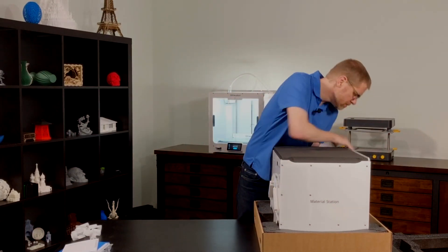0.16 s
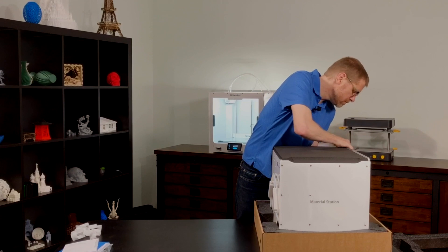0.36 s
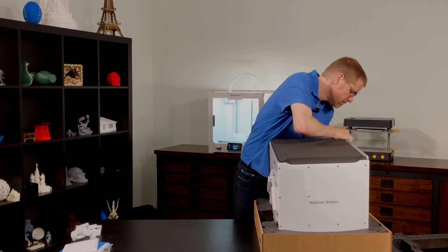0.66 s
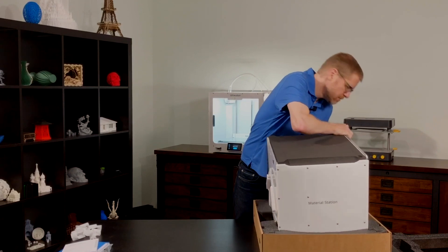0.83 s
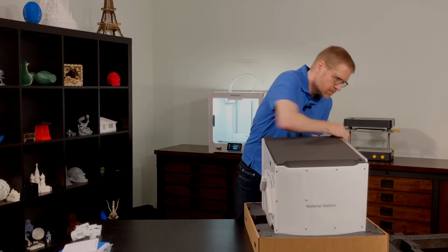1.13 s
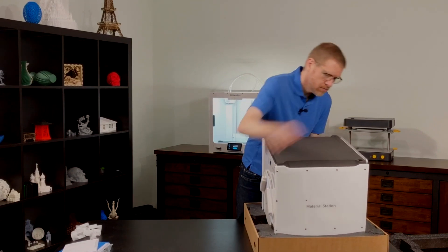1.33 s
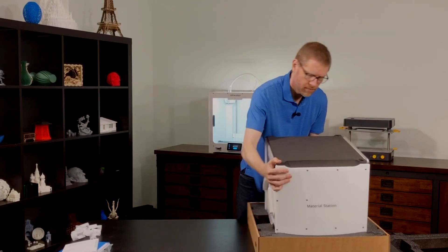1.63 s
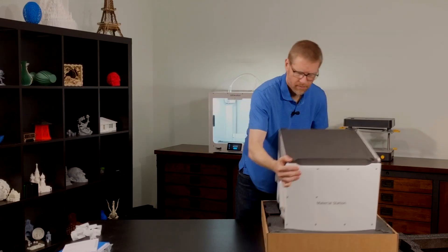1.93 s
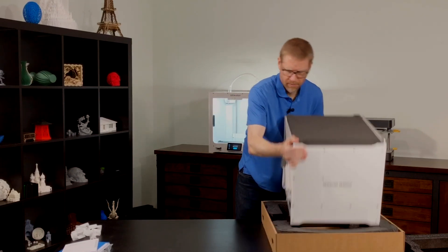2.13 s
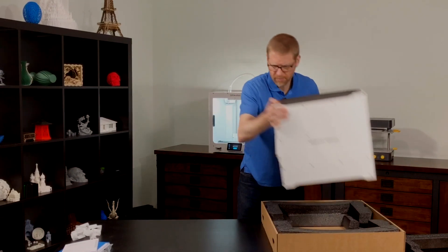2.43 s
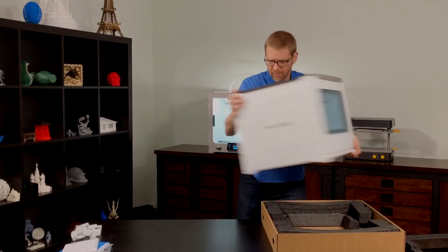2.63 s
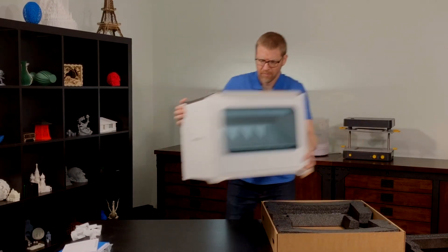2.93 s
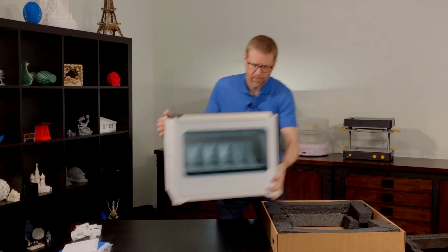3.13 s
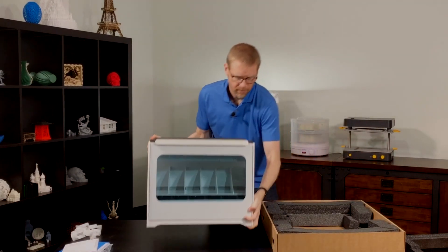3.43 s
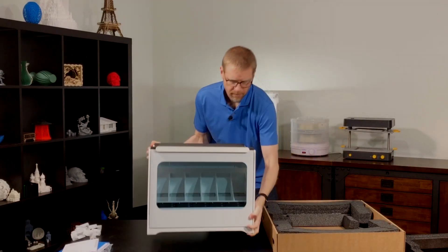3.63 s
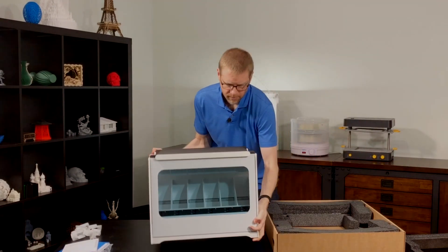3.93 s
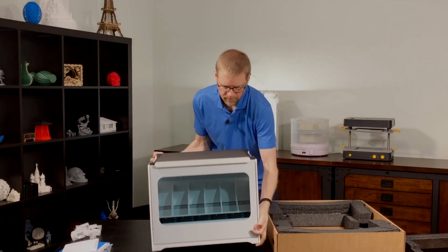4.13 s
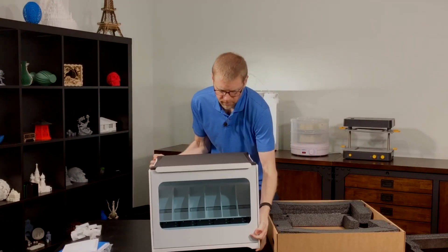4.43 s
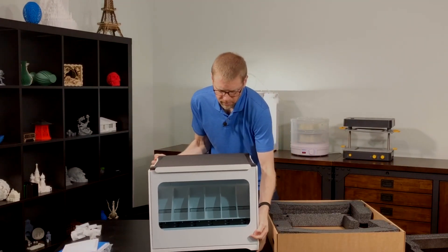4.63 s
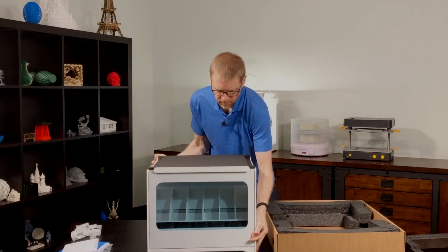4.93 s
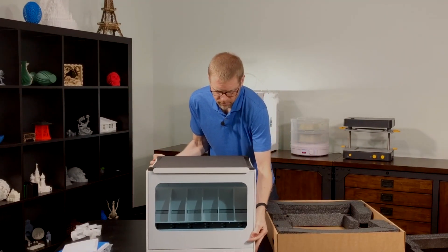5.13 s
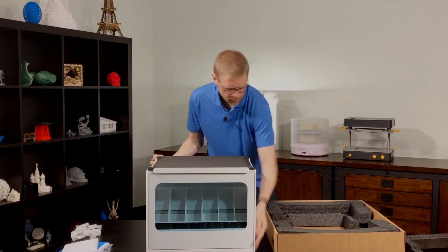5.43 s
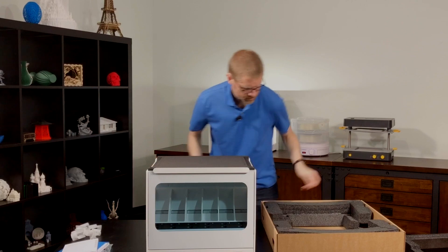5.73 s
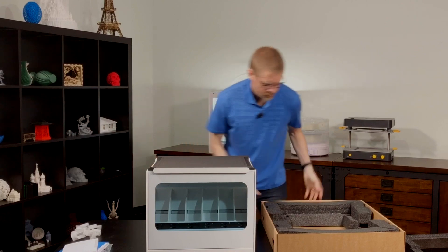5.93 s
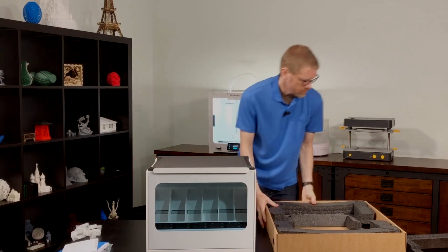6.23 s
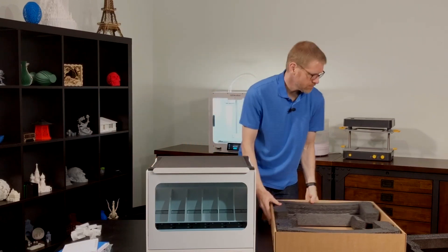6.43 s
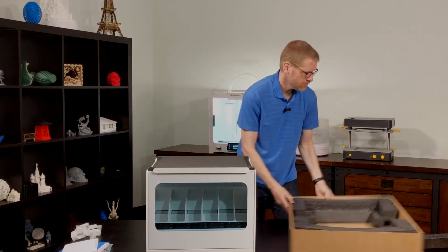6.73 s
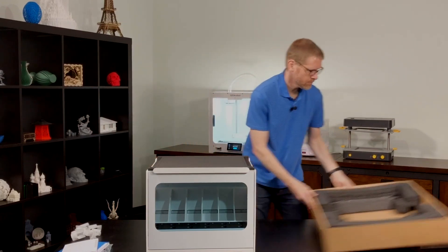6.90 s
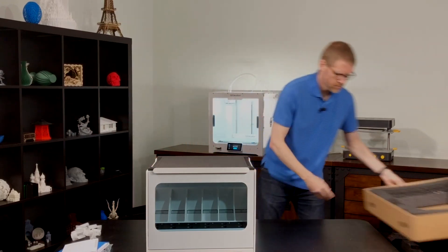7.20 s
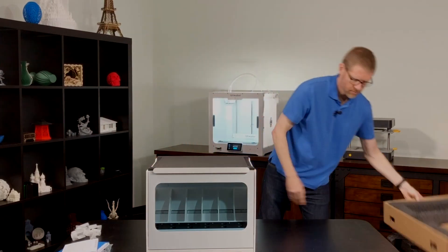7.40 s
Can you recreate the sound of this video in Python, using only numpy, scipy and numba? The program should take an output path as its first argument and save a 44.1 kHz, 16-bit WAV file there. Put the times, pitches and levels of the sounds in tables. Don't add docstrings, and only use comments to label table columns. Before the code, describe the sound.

A small bare room with a quick flutter and short tail, heard from a microphone on the worker's shirt with faint hiss and cloth rumble. From 0 to 2.2 s hands rub a cabinet in foam: uneven hollow rasp and hiss, dry snaps near 0.5, 0.9 and 1.2. At 2.3 a deep shirt tug and panel knocks; at 2.6 a short mid-high foam squeal, then a sharp bright snap at 2.7 and a thin faint squeak near 2.9. Carrying until 4.3 is quiet, with big low air buffets around 2.9 to 3.4. At 4.34 feet meet the wooden table, rocking in several dull thumps to 4.6; at 5.01 comes the loudest, hardest thump with rattle and a few settling knocks. Light rubs follow. From 6.1 the cardboard tray is gripped and dragged, rasping strongest near 6.8 with chirp and snaps, crackling at 7.0, then a final knock at 7.5.

```python
import sys
import numpy as np
from scipy import signal
from scipy.fft import rfft, irfft, next_fast_len
from scipy.io import wavfile
from scipy.ndimage import uniform_filter1d
from numba import njit

SR = 44100
rng = np.random.default_rng(int(sys.argv[2]) if len(sys.argv) > 2 else 0)


def volts(x):
    e = np.asarray(x, float) / 20
    return 10 ** e


def transcribe(signal):
    frames = np.atleast_2d(signal).T
    limited = np.clip(frames, -1, 1)
    pcm = np.round(limited * 32767).astype(np.int16)
    wavfile.write(sys.argv[1], SR, pcm)


N = 333306

# peak in seconds, rise in seconds, fall in seconds,
# pressure in dB, brightness in dB.
RUBS = [(0.0, 0.027, 0.025, -55, -0.5), (0.18, 0.32, 0.016, -60.5, -28), (0.46, 0.32, .05, -57.5, 0),
        (0.495, 0.019, 0.26, -47, 1.5), (0.59, .12, 0.49, -49, -19), (0.78, 0.1, 0.05, -50, -18),
        (0.88, 0.022, 0.14, -42.5, 7), (1.03, 0.42, 0.38, -46.5, -11.5), (1.15, 0.69, 0.19, -45, 3),
        (1.325, 0.033, 0.12, -53, -2), (1.67, 0.23, 0.22, -50.5, -18.5), (1.84, 0.36, 0.19, -56, 12.5),
        (1.99, 0.47, 0.04, -46.5, -3), (2.11, 0.43, 0.2, -47, 7), (2.212, 0.13, 0.091, -59, -11)]
# peak in seconds, rise in seconds,
# fall in seconds, pressure in dB, brightness in dB.
CARRY = [(2.333, 0.05, 0.067, -46, -16.5), (2.52, 0.23, 0.11, -49, -21),
         (2.588, 0.094, 0.034, -26.5, -24.5), (2.609, .015, 0.041, -44, -34), (2.752, 0.05, 0.43, -62, 7.5),
         (2.962, 0.018, 0.02, -62, 12.5), (3.0, 0.014, 0.12, -45, -17), (3.27, 0.44, .07, -64.5, -11),
         (3.377, 0.013, 0.08, -62.5, 9), (3.856, 0.072, 0.32, -75.5, 10.5), (4.108, 0.13, .02, -64.5, -4),
         (4.658, 0.024, .12, -47.5, -15), (4.878, 0.13, 0.18, -50.5, -11.5), (4.97, 0.15, 0.089, -44, -8),
         (5.362, 0.1, .11, -65.5, 4), (5.449, 0.04, 0.14, -57.5, 8), (5.55, .03, .13, -60, 2.5),
         (5.7, 0.32, 0.33, -75, 13), (5.984, 0.35, 0.029, -67.5, -7)]
# peak in seconds, rise in seconds,
# fall in seconds, pressure in dB, brightness in dB.
DRAG = [(6.094, 0.012, 0.22, -63.5, 11), (6.17, 0.092, 0.27, -54, -24), (6.31, 0.17, 0.33, -45, 0.5),
        (6.39, 0.042, 0.048, -53, 5), (6.49, 0.087, 0.28, -49.5, 6), (6.58, 0.13, 0.16, -47, 3),
        (6.685, 0.23, 0.063, -47.5, 1), (6.781, 0.12, 0.096, -40.5, -2), (6.861, 0.61, 0.11, -50.5, 13.5),
        (6.93, 0.015, 0.24, -49.5, 2), (7.012, 0.017, 0.0095, -43.5, -2), (7.031, 0.017, 0.11, -53, -4),
        (7.399, 0.015, 0.019, -49.5, -42), (7.46, 0.092, 0.52, -58, -6), (7.512, 0.013, 0.032, -38.5, -3),
        (7.528, 0.027, 0.19, -41, 0)]
# time in seconds, octaves above the slowest hiss.
STROKE_SPEED = [
    [(0.0, 1.8), (0.5, 0.79), (0.6, 0.3), (0.77, 0.92), (0.9, 0.5), (1.0, 0.68), (1.13, 1.02), (1.25, 0.7),
     (1.35, 1.5)],
    [(1.55, 0.1), (1.7, 0.6), (1.84, 1.05), (1.96, 0.44), (2.1, 0.66), (2.2, 0.36), (2.6, 0.85),
     (2.8, 0.76), (5.9, 0.77)],
    [(6.1, 1.5), (6.3, 0.76), (6.5, 0.88), (6.67, 0.92), (6.78, 1.06), (6.87, 1.5), (6.95, 0.76),
     (7.1, 1.3), (7.56, 0.56)],
]
# frequency in Hz, width in Hz, level in dB.
BOX_MODES = [(202, 64, -20), (315, 31, 5), (400, 110, 6), (564, 60, -16), (740, 27, -15.5), (1030, 81, 1)]
# frequency in Hz, level in dB.
RASP_SPECTRUM = [(710, -59), (1200, -27), (4200, -28), (5600, -35), (9600, -60)]
# peak in seconds, rise
# in seconds, fall in seconds, level in dB, frequency in Hz.
CATCHES = [(0.5, 0.063, 0.12, -45, 626), (0.58, 0.054, 0.086, -47.5, 2800),
           (0.885, .015, 0.019, -39.5, 3950), (0.91, .02, 0.045, -36, 3300),
           (1.025, .008, 0.013, -49, 6500), (1.13, 0.11, 0.21, -48, 2460), (1.196, .012, .015, -38, 2870),
           (1.325, .012, 0.029, -48, 4400), (2.59, .08, 0.015, -39, 4450), (2.56, 0.066, .05, -38.5, 700),
           (2.595, 0.023, 0.024, -34.5, 2300), (3.0, .008, 0.046, -55, 1900),
           (3.06, 0.0073, 0.029, -53, 2640), (2.72, .012, 0.14, -53, 5550), (4.345, .006, 0.036, -41, 770),
           (4.415, .01, .03, -43, 1870), (5.06, .02, 0.14, -38, 3670), (5.08, 0.036, 0.067, -26.5, 1050),
           (6.31, .05, 0.099, -49, 780), (6.39, .03, .03, -58, 7500), (6.87, .06, 0.042, -40, 9300),
           (6.87, 0.053, 0.057, -40, 5250), (7.49, 0.026, .02, -58, 1820), (2.222, 0.0049, 0.018, -43, 500),
           (2.33, 0.03, .07, -43, 1200), (2.58, 0.1, .08, -38, 230), (2.59, .08, .04, -39, 1600),
           (4.35, .012, .2, -46, 1494), (4.95, 0.14, .1, -53, 1887), (2.34, .01, .03, -51, 5500),
           (2.85, .1, 0.061, -55, 8000), (2.8, .08, .1, -61, 10800), (2.899, 0.15, .06, -55.5, 300),
           (4.343, 0.0047, 0.071, -21, 400), (4.509, .004, 0.054, -30, 420),
           (5.015, 0.0035, 0.028, -17, 390), (5.03, 0.017, 0.093, -23.5, 760),
           (5.13, 0.054, 0.11, -31.5, 320), (5.57, 0.14, 0.088, -58.5, 300), (6.15, .05, 0.093, -48.5, 320),
           (7.52, 0.0093, 0.066, -32, 400)]
# time in seconds, frequency in Hz, level in dB.
SQUEALS = [
    [(2.46, 1205, -49), (2.53, 1180, -37), (2.57, 1130, -26.5), (2.59, 1160, -23), (2.605, 1130, -30),
     (2.63, 1150, -51)],
    [(2.73, 5430, -81), (2.80, 5530, -59), (2.86, 5330, -51), (2.92, 5440, -64)],
    [(6.75, 783, -97), (6.77, 757, -34), (6.80, 770, -38.5), (6.83, 770, -41)],
]
# frequency in Hz, width in Hz, depth from 0 to 1.
CHEST_DIPS = [(1324, 300, 0.1), (2800, 620, 0.13)]
# start in seconds, peak in dB, hardness in dB per octave.
THUMPS = [(4.3415, -12.5, -1), (4.378, -22, -1), (4.418, -16.5, -1.5), (4.451, -22, -1.5),
          (4.508, -15, -2.5), (4.544, -19.5, -1.5), (4.563, -26, 1), (4.595, -30.5, -2.5),
          (5.0121, -6, -0.5), (5.025, -9, -1.5), (5.074, -18, 1), (5.125, -13, -1.5), (5.188, -22, 1.5)]
# frequency in Hz, level in dB, T60 in seconds.
TABLE_MODES = [(78.5, -14.5, 0.15), (106, 0.5, 0.065), (140.7, -14.5, 0.043), (160, 0, 0.063),
               (184.4, -4, 0.093), (205, -4.5, 0.048), (252, -9, 0.046), (288.3, 0.5, 0.062),
               (340, 1, 0.045), (409.6, 2.5, 0.041), (471.6, 2, 0.039), (551, -2, 0.041),
               (662, -2.5, 0.038), (796, -2, 0.029)]
# start in seconds, peak in dB, frequency in Hz,
# T60 in seconds.
RINGS = [(4.340, -12, 126.5, 0.084), (4.374, -13, 152, 0.11), (4.425, -22, 105, 0.18),
         (4.506, -19, 107, 0.21), (4.553, -24, 154, .15), (4.59, -24, 148.5, .15),
         (5.012, -9.5, 452, 0.033), (5.013, -11.5, 93, 0.19), (5.036, -14, 333, .1),
         (5.085, -16.5, 106, 0.25), (5.12, -16, 243, 0.05), (5.165, -19, 160, 0.091),
         (5.18, -21.5, 248, 0.073)]
# start in seconds, fall in seconds, rattle in dB,
# bright part in dB relative, table boom in dB relative.
SHAKES = [
    (4.339, 0.27, -29, -28.5, -5.5),
    (4.508, 0.38, -43.5, -17.5, 19),
    (5.012, 0.17, -12.5, -22, 9.5),
    (5.125, 0.12, -34, -20, 5),
]
# start in seconds, peak in dB, frequency in Hz, T60 in seconds.
KNOCKS = [(0.472, -53, 600, 0.038), (1.317, -37.5, 740, 0.028), (2.222, -30.5, 454, 0.012),
          (2.2845, -19, 240, 0.019), (2.285, -25.5, 1063, 0.019), (2.301, -29, 450, 0.0076),
          (2.3275, -25.5, 603, 0.042), (2.391, -36, 720, 0.082), (2.992, -30.5, 740, 0.015),
          (3.021, -39, 476, 0.015), (3.056, -35.5, 455, 0.048), (3.371, -53, 494, 0.17),
          (3.861, -57, 494, 0.067), (4.098, -64, 700, 0.049), (4.342, -17.5, 674, 0.025),
          (4.508, -23, 297, 0.023), (5.0125, -5, 450, 0.028), (5.438, -45, 923, 0.032),
          (6.81, -36, 297.7, 0.035), (6.929, -45, 1606, 0.046), (7.512, -22, 364, 0.018)]
# start in seconds, peak in dB, frequency in Hz, T60 in seconds.
TAPS = [(3.26, -50.5, 1660, 0.027), (6.947, -35.5, 1470, 0.028), (7.012, -32, 588, 0.016),
        (7.385, -38, 445, 0.018), (7.506, -19, 545, 0.022)]
# start in seconds, peak in dB, frequency in Hz,
# lower crackle in dB relative, upper fizz in dB relative.
SNAPS = [(0.497, -26, 5440, -18, -4), (0.5127, -30, 5500, -30, -10), (0.7646, -35, 3000, -43, -11),
         (0.8344, -46, 4140, -16, -6), (0.8783, -25.5, 3900, -30, -11), (0.8917, -24, 6400, -4.5, -5),
         (0.9064, -34, 3960, -25, -2), (1.024, -26, 6500, -15, -9), (1.1977, -31, 2850, -17, -8),
         (1.32, -30.5, 4300, -6, -4), (1.514, -36.5, 5530, -20, 0), (2.302, -44, 4000, 16, -4),
         (2.328, -31, 4700, 0, -13), (2.3554, -39.5, 8650, -12, -10), (2.3727, -39.5, 4500, 4, -10),
         (2.706, -15.5, 5460, -17, -7.5), (2.959, -41, 5040, -19, -11), (2.9947, -46, 4150, 9.5, -8),
         (3.024, -36.5, 4240, -19, -10), (3.3731, -46, 6300, -0.5, -4), (3.419, -43, 5300, -19, -8),
         (4.318, -50, 3500, 2.5, -3), (4.663, -31, 5670, -9, -14), (5.013, -28.5, 4500, 19.5, -6),
         (5.025, -14.5, 7370, 3, -4), (5.43, -36, 6100, -12, 1), (5.5425, -43, 7070, -1, -3),
         (5.8556, -47.5, 6000, -13, 1), (6.0937, -54.5, 7000, -18, -5), (6.4554, -31, 5500, -4.5, -6),
         (6.7682, -41, 6000, -35.5, -6), (6.8166, -22, 4560, -6, -4), (6.9453, -21.5, 4700, -5, -4),
         (7.01, -29, 6500, -5, -2), (7.2173, -49.5, 5530, 1, -4.5), (7.4147, -55, 4000, -10, -10),
         (7.517, -30, 4800, -11, -4), (7.4335, -47, 6680, -18, -6)]
# peak in seconds, rise in
# seconds, fall in seconds, deep part in dB, upper part in dB relative.
GUSTS = [(0.05, 0.56, 0.33, -35.5, -9.5), (0.24, 0.065, 0.048, -42, -5), (0.6, 1, 0.96, -42.5, -7),
         (0.94, 0.32, 0.066, -40, -7), (1.2, 0.67, 0.51, -39, -7), (1.4, 0.073, 0.17, -33, -22),
         (1.64, 0.49, 0.12, -33.5, -11.5), (1.88, 0.36, 0.33, -44.5, -19), (2.15, 0.74, 0.58, -43.5, -5.5),
         (2.34, 0.11, 0.12, -29, -2.5), (2.539, 0.066, 0.17, -33, 2.5), (2.72, 0.46, 0.31, -29.5, -30),
         (2.9, 0.19, 0.57, -18, -35), (2.99, .11, 0.21, -41, -21), (3.22, 0.047, 0.029, -11.5, -36.5),
         (3.367, 0.11, 0.042, -12, -63), (3.511, 0.24, 0.094, -31.5, -22), (3.66, 0.1, 0.12, -19, -42),
         (3.881, 0.19, 0.029, -28, -26), (4.107, 0.47, 0.12, -40, -12),
         (4.345, 0.016, 0.18, -26.5, 2.5), (4.55, 0.22, 0.2, -44.5, 21.5), (4.9, 0.11, 0.25, -45, 1),
              (5.02, 0.077, 0.45, -30.5, -14), (5.57, 0.15, 0.13, -32.5, -6), (5.91, 0.3, 0.39, -27, -25),
              (6.1, 0.1, 0.98, -32.5, -18), (6.3, 0.29, 0.1, -27.5, -11), (6.579, 0.077, 0.03, -35.5, -14),
              (6.83, 0.13, 0.11, -61, 16), (6.99, 0.043, 0.16, -37.5, -11), (7.09, 0.075, 0.11, -39.5, -20),
              (7.27, 0.24, 0.079, -29.5, -43), (7.38, 0.19, 0.1, -32.5, -27.5),
              (7.51, 0.033, 0.24, -44.5, 16)]
# start in seconds, peak in dB, frequency in Hz, T60 in seconds.
BUMPS = [(0.09, -37, 66, .15), (1.385, -24, 38, .1), (1.39, -30, 110, .11), (1.635, -33, 70, .14),
         (2.338, -20, 26, .12), (2.2835, -13, 90, .05), (2.79, -30, 85, .1), (2.84, -24, 62, .1),
         (2.98, -27, 60, .15), (4.341, -36, 70, .2), (5.012, -16, 28, .13), (5.014, -26, 105, .24),
         (5.548, -28, 69, .17), (6.806, -35, 100, .16)]
# frequency in Hz, level in dB.
FLOOR_SPECTRUM = [(35, -43.5), (60, 4.5), (124, -18), (329, -12.5), (563, -24), (694, -23.5), (1300, -27.5),
                  (5400, -24), (9460, -26), (14700, -33), (16200, -39)]
# frequency in Hz, T60 in seconds.
ROOM_T60 = [(60, 0.6), (250, 0.51), (1000, 0.29), (4000, 0.41), (8000, 0.11), (15000, 0.34)]


def unit(x):
    return x / np.sqrt(np.mean(x ** 2) + 1e-20)


def evened(x, span_s):
    power = uniform_filter1d(x ** 2, round(span_s * SR)).clip(1e-20)
    return unit(x / power ** .4)


def in_time(rows, silent=-120):
    s, *columns = np.transpose(rows)
    return [np.interp(np.arange(N) / SR, s, c, silent, silent) for c in columns]


def at_hz(points, hz):
    point_hz, value = np.transpose(points)
    return np.interp(np.log(hz), np.log(point_hz), value)


def swells(rows, rounding):
    t = np.arange(0, N + 32, 32) / SR
    s, rise, fall, db, relative_db = np.transpose(rows)[:, :, None]
    distance = np.abs(t - s) / np.where(t < s, rise, fall)
    shape = db - 20 * distance ** rounding
    power = [np.sum(volts(2 * (shape + extra)), axis=0) + 1e-14 for extra in (0, relative_db)]
    return [np.interp(np.arange(N) / SR, t, 10 * np.log10(p)) for p in power]


def gains(db, smooth_hz):
    return signal.sosfilt(signal.butter(1, smooth_hz, fs=SR, output="sos"), volts(db))


def drift(rate):
    knot_rate = 200
    knots = rng.standard_normal(int(N / SR * knot_rate) + 3)
    r = np.exp(-2 * np.pi * rate / knot_rate)
    slow = unit(signal.lfilter([1], [1, -2 * r, r * r], knots))
    return np.interp(np.arange(N) * knot_rate / SR, np.arange(len(slow)), slow)


def band(x, low_hz, high_hz, order=2):
    return signal.sosfilt(signal.butter(order, [low_hz, high_hz], "band", fs=SR, output="sos"), x)


def coloured(x, spectrum):
    size = next_fast_len(len(x))
    hz = np.maximum(np.fft.rfftfreq(size, 1 / SR), 1)
    return unit(irfft(rfft(x, size) * volts(at_hz(spectrum, hz)), size)[:len(x)])


def resonate(x, hz, width):
    r = np.exp(-np.pi * width / SR)
    gain = (1 - r * r) / 2
    return signal.lfilter([gain, 0, -gain], [1, -2 * r * np.cos(2 * np.pi * hz / SR), r * r], x)


@njit
def swept(x, hz, width_share):
    out = np.zeros(len(x))
    for i in range(2, len(x)):
        r = np.exp(-np.pi * width_share * hz[i] / SR)
        turn = 2 * r * np.cos(2 * np.pi * hz[i] / SR)
        out[i] = (1 - r * r) / 2 * (x[i] - x[i - 2]) + turn * out[i - 1] - r * r * out[i - 2]
    return out


def slips(per_s, spread_db, clump_db):
    sizes = volts(spread_db * np.minimum(rng.exponential(1, N), 5)) * rng.choice([-1, 1], N)
    slipping = rng.random(N) < per_s / SR
    return unit(sizes * slipping * volts(clump_db * drift(8.8)))


def add(out, s, sound):
    at = round(s * SR)
    out[at:at + len(sound)] += sound[:N - at]


def blows(table, ratios, rise_cycles):
    out, t = np.zeros(N), np.arange(SR // 3) / SR
    chance = rng.standard_normal((len(table), len(ratios), 2))
    for (s, db, hz, t60), luck in zip(table, chance):
        tones = np.zeros(len(t))
        for ratio, (level, detune) in zip(ratios, luck):
            mode_db = 2 * level - 6 * abs(np.log2(ratio))
            mode_hz = hz * ratio * (1 + level * detune / 30)
            tones += volts(mode_db) * np.sin(2 * np.pi * mode_hz * t)
        sound = tones * (1 - np.exp(-t * hz / rise_cycles)) * volts(-60 * t / t60)
        add(out, s, volts(db) * sound / np.abs(sound).max())
    return out


def friction():
    body_db, hiss_db = swells(RUBS + CARRY + DRAG, 1.2)
    brightness = hiss_db - body_db
    rasp_db = body_db - 1 + 0.44 * brightness.clip(-16)
    slowest_hiss_hz = 3150
    hiss_hz = slowest_hiss_hz * 2 ** in_time(sum(STROKE_SPEED, []), silent=1)[0]

    drive = slips(2500., 3.0, 2.0)
    hollow = np.zeros(N)
    for k, (hz, width, db) in enumerate(BOX_MODES):
        hollow += volts(db) * resonate(drive, hz, width) * (-1) ** k
    body = evened(unit(hollow) + 5.3 * unit(band(drive, 280, 874)), 0.027)
    rasp = evened(coloured(slips(5000., 2.5, 3.0), RASP_SPECTRUM), 0.04)
    grains = band(slips(10000., 2.0, 3.2), 1500, 13600)
    hiss = evened(swept(grains, hiss_hz, .99), 0.12)
    levels_db = np.array([body_db, rasp_db, hiss_db]) - 1.5
    return np.sum(gains(levels_db, 60) * [body, rasp, hiss], axis=0)


def catches():
    lead_s, width_share = .2, 0.24
    drive, out = slips(4000., 2.5, 1.5), np.zeros(N)
    t = np.arange(SR // 2) / SR - lead_s
    for s, rise, fall, db, hz in CATCHES:
        at = round((s - lead_s) * SR)
        narrow = resonate(drive[at:at + len(t)], hz, width_share * hz)
        tone = unit(resonate(narrow, hz, 2 * width_share * hz))
        shape = volts(db - 20 * np.abs(t) / np.where(t < 0, rise, fall))
        add(out, at / SR, tone * shape[:len(tone)])
    return out


def squeals():
    hz, db = np.max([in_time(rows) for rows in SQUEALS], axis=0)
    hz = np.clip(hz, 700, 6000)
    narrow = swept(slips(8000., 2.0, 0.5), hz, .12)
    return volts(db - 3) * evened(swept(narrow, hz, .22), .02)


def patchy(x):
    for hz, width, depth in CHEST_DIPS:
        x = x - depth * resonate(x, hz, width)
    out = x.copy()
    for hz in np.geomspace(700, 9000, num=8):
        swell = volts(1.3 * drift(12.0)) - 1
        out += swell * resonate(x, hz, hz / 4)
    return out


def thumps():
    contact_s = 0.0021
    out, t = np.zeros(N), np.arange(SR // 2) / SR
    chance = rng.standard_normal((len(THUMPS), len(TABLE_MODES), 2))
    loading = np.sin(np.pi / 2 * np.minimum(t / contact_s / 2, 1)) ** 2
    for (s, db, hard_db), luck in zip(THUMPS, chance):
        modes = np.zeros(len(t))
        for (hz, mode_db, t60), (strength, phase) in zip(TABLE_MODES, luck):
            level_db = mode_db + hard_db * np.log2(hz / 150) + 2 * strength
            modes += volts(level_db - 60 * t / t60) * np.sin(2 * np.pi * hz * t + 0.78 * phase)
        modes *= loading
        add(out, s, volts(db) * modes / np.abs(modes).max())
    return out


def rings():
    return blows(RINGS, [1.0], 0.98)


def rattle():
    rise_s, boom_lingers, rounding = 0.0021, 0.65, 1.08
    parts = [(s, rise_s, fall, db, bright) for s, fall, db, bright, _ in SHAKES]
    table = [(s, rise_s, fall * boom_lingers, db, boom) for s, fall, db, _, boom in SHAKES]
    dull_db, bright_db = swells(parts, rounding)
    _, boom_db = swells(table, rounding)

    drive = slips(5000., 1.3, 0.94)
    modes = sum(volts(db) * resonate(drive, hz, 6.1 / t60) for hz, db, t60 in TABLE_MODES[1:11])
    boom = band(evened(modes, 0.025), 110, 594)
    dull = unit(band(band(drive, 560, 1380, order=1), 600, 3330, order=1))
    bright = unit(band(band(drive, 2200, 5000, order=1), 1900, 7500, order=3))
    shake = gains([dull_db, bright_db, boom_db - 4], 150)
    return volts(-8.0) * np.sum(shake * [dull, bright, boom], axis=0)


def knocks():
    panels = blows(KNOCKS, [.55, .75, 1.0, 1.3, 1.7, 2.2, 2.9], 0.25)
    return panels + blows(TAPS, [1.0, 1.12], 0.74)


def snaps():
    t60_s, first_break = .0045, 6
    out, t = np.zeros(N), np.arange(SR // 20) / SR
    for s, db, hz, low_db, top_db in SNAPS:
        burst = rng.standard_normal(len(t)) + first_break * (t == 0)
        burst *= volts(-60 * t / t60_s)
        fizz = band(burst, 1.33 * hz, 12000, order=3) + .2 * band(burst, 11000, 15000)
        bright = band(burst, .84 * hz, 1.2 * hz, order=4) + volts(top_db) * fizz
        low = band(burst, 1000, 3500)
        sound = bright / np.abs(bright).max() + volts(low_db) * low / np.abs(low).max()
        add(out, s, volts(db) * sound)
    return out


def heave():
    start_s, db, hz = 2.2888, -6.5, 37.5
    out, turns = np.zeros(N), np.arange(round(1.5 * SR / hz)) * hz / SR
    edges = np.sin(np.pi * turns / 1.5) ** .15
    add(out, start_s, -volts(db) * np.sin(2 * np.pi * turns) * edges)
    return out


def rumble():
    deep = evened(band(rng.standard_normal(N), 13, 44, order=3), .1)
    upper = evened(band(rng.standard_normal(N), 60, 190), .05)
    at_rest_db = [[-56.5], [-64]]
    gusts_db = np.maximum(swells(GUSTS, 1.1), at_rest_db)
    deep_gain, upper_gain = gains(gusts_db - [[0], [4]], 30)
    eddies = band(deep_gain * deep, 11, 54, order=3) + band(upper_gain * upper, 55, 240)
    return eddies + blows(BUMPS, [1.0], 1.0)


def noise_floor():
    return volts(-61.5) * coloured(rng.standard_normal(N), FLOOR_SPECTRUM)


def room(x, tail_db, flutter_hz):
    t = np.arange(SR) / SR
    white = rng.standard_normal((2, SR))
    tail = np.zeros(SR)
    for k, low_hz in enumerate(45 * 2 ** np.arange(9.)):
        octave = band(white[k % 2], low_hz, min(2 * low_hz, 20000))
        tail += octave * volts(-60 * t / at_hz(ROOM_T60, np.sqrt(2) * low_hz))
    tail *= 1 - np.exp(-t / 0.0044)

    round_trip_s, flutter_db = .01668, -7
    bounces, flutter = np.arange(1, 9), np.zeros(SR)
    flutter[np.round(bounces * round_trip_s * SR).astype(int)] = volts(flutter_db * bounces ** .8)
    response = volts(tail_db) * tail / np.sqrt(np.sum(tail ** 2)) + band(flutter, flutter_hz, 8600, order=1)
    return x + signal.fftconvolve(x, response)[:N]


def scene():
    near = room(friction() + squeals() + catches(), -9, 8000)
    impacts = room(thumps() + rattle() + knocks(), -5, 6200)
    cracks = room(snaps(), -17.5, 1500)
    capsule = rumble() + heave() + noise_floor()
    return (patchy(near) + impacts + cracks + capsule + rings())[None]


def band_limit(x):
    return signal.sosfilt(signal.butter(12, 16450, fs=SR, output="sos"), x)


def record(dry):
    rounded = np.tanh(dry)
    low_pass = signal.ellip(10, .5, 60, 15740, fs=SR, output="sos")
    mix = signal.sosfilt(low_pass, rounded)
    return band_limit(mix)


dry = scene()
out = record(dry)
transcribe(out)
```